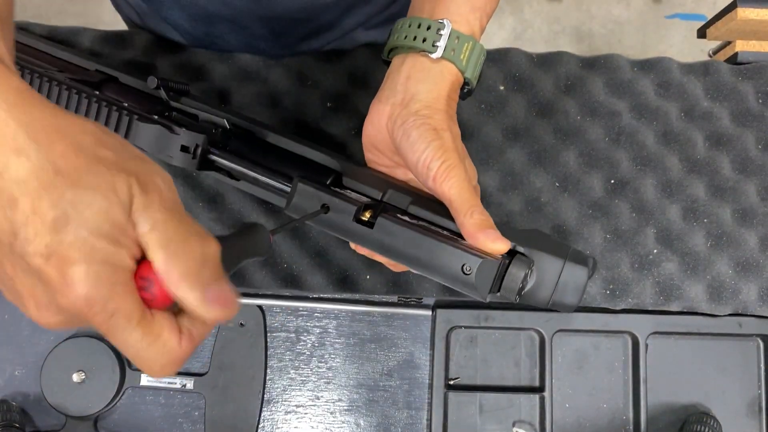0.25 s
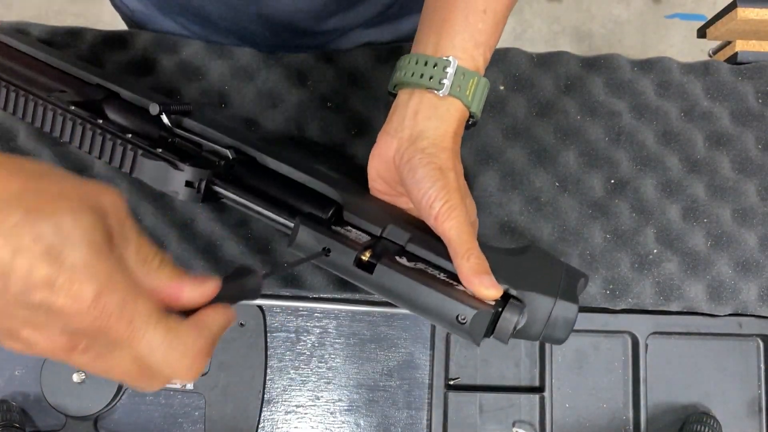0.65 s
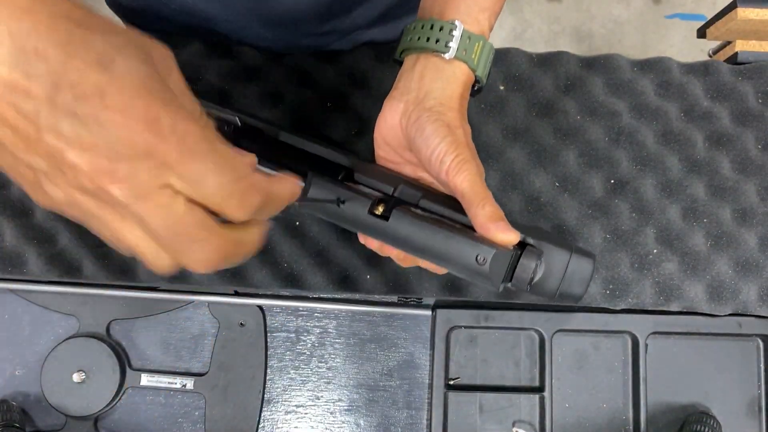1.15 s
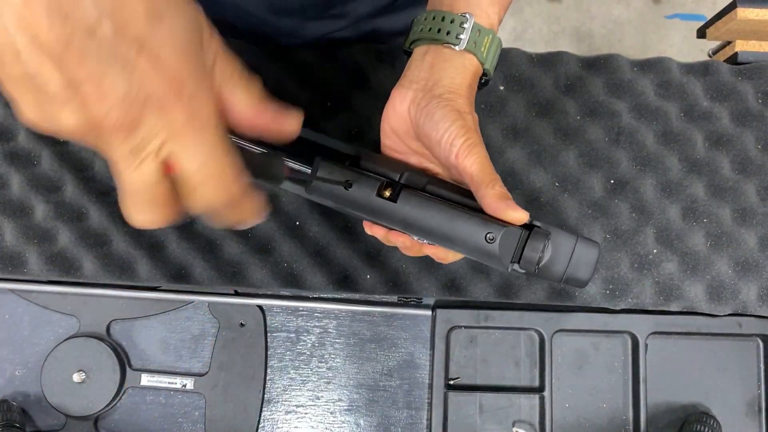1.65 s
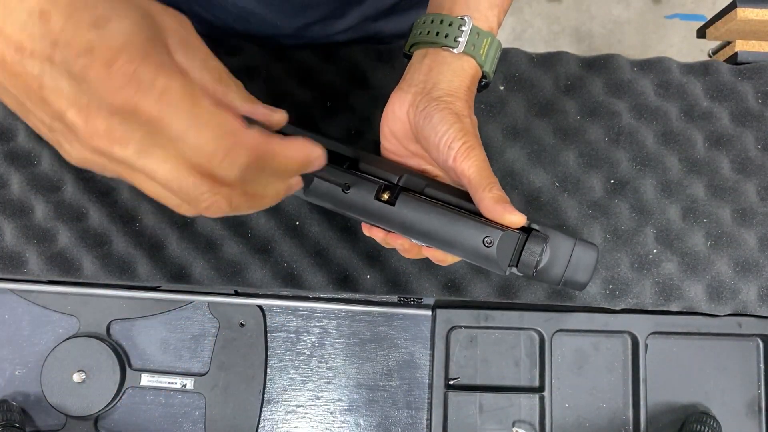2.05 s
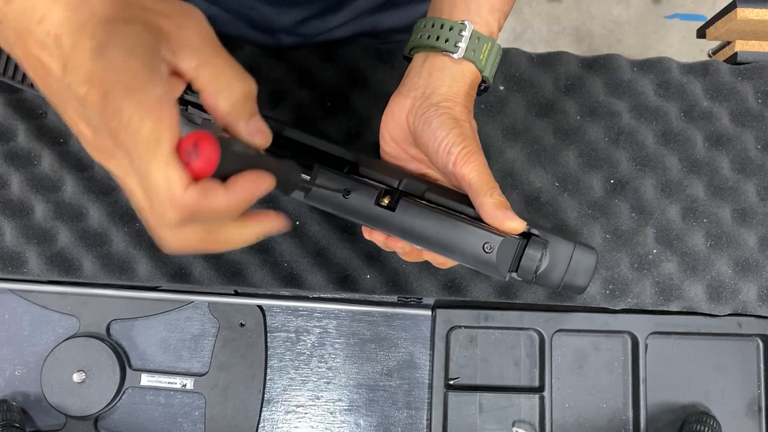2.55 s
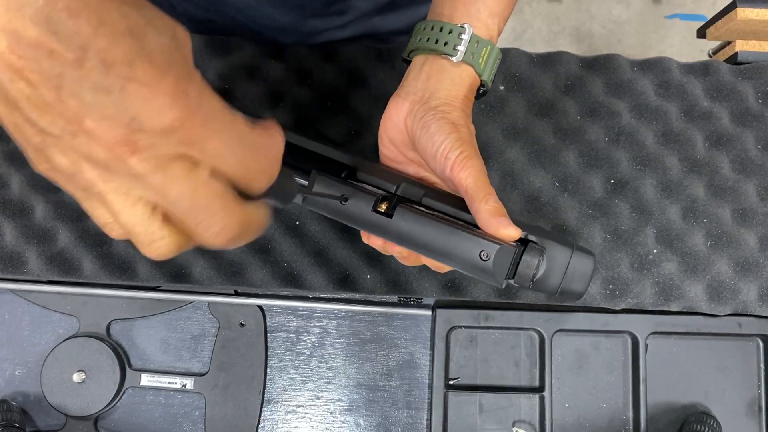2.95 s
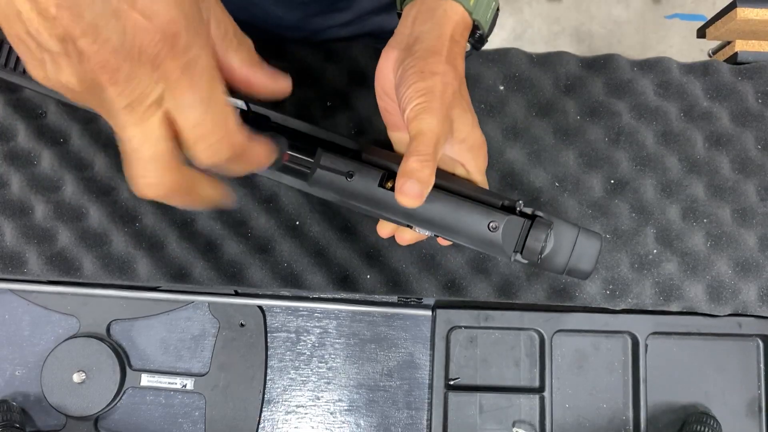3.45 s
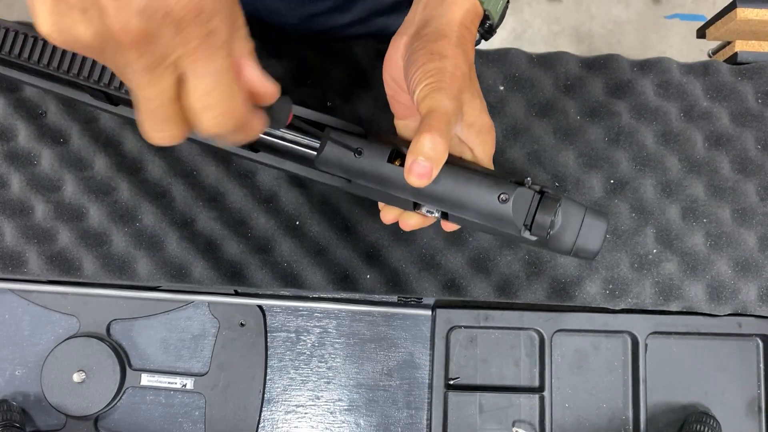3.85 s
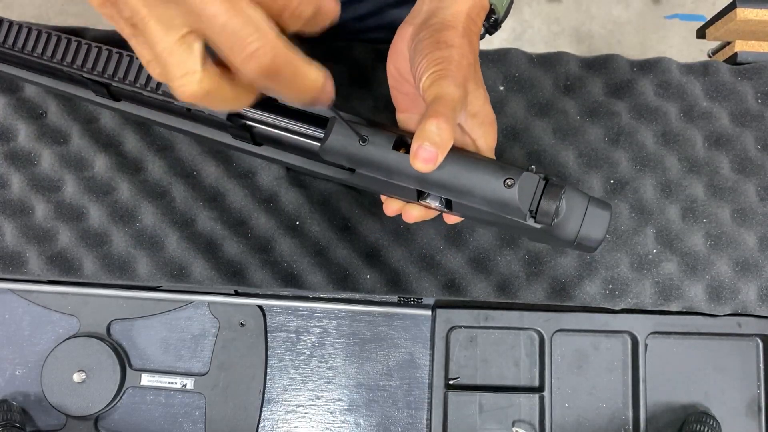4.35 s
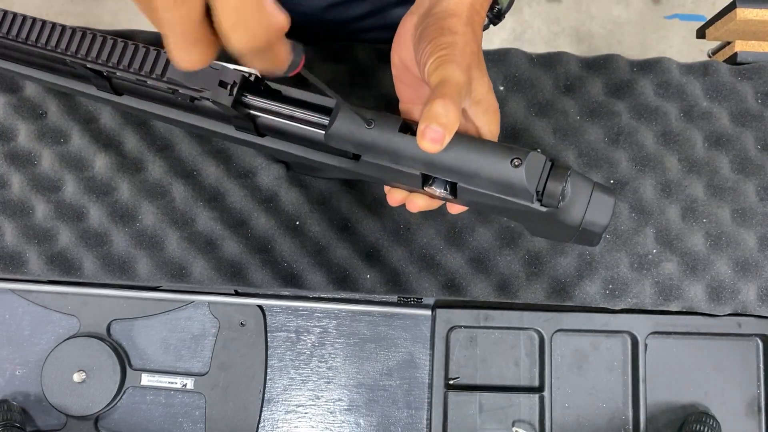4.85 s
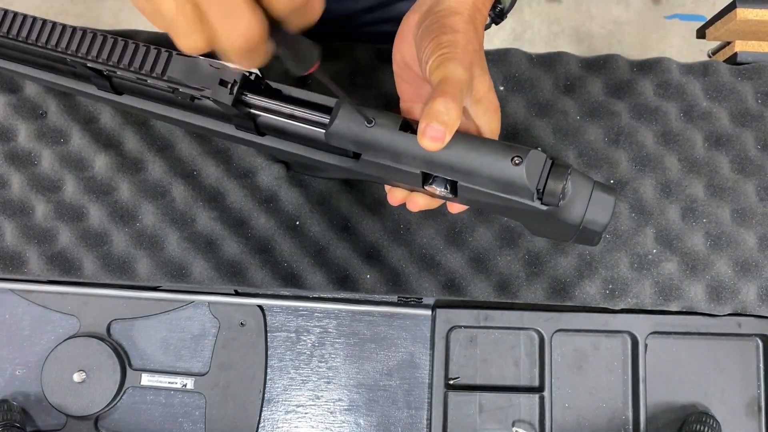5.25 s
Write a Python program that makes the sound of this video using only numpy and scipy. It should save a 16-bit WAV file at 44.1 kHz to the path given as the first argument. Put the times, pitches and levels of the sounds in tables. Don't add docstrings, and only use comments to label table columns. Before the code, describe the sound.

Compressed air hisses steadily from a loosened fitting on an air rifle, over a soft room rumble, with one sharp metallic click at the start.

```python
import sys
import numpy as np
from scipy import signal
from scipy.io import wavfile
from scipy.ndimage import uniform_filter1d

SR = 44100
rng = np.random.default_rng(int(sys.argv[2]) if len(sys.argv) > 2 else 0)


def boost(x):
    u = np.asarray(x, float) / 20
    return 10 ** u


def to_wav(s):
    ch = np.atleast_2d(s).T
    pcm = np.round(np.clip(ch, -1, 1) * 32767)
    wavfile.write(sys.argv[1], SR, pcm.astype(np.int16))


N = 242991

# freq_hz, density_db
JET_COLOUR = [(2200, -14.5), (3000, -8.9), (3500, -9.8), (4400, -5.3), (5400, -8.0), (6900, -8.1),
              (8400, -3.0), (9300, -2.8), (10500, -5.9), (11400, -6.9), (12400, -2.7), (13500, -1.9),
              (14100, -3.7), (15300, 0.0)]
# freq_hz, likeness_0_to_1
JET_LIKENESS = [(2500, .78), (3500, .74), (4400, .62), (5300, .68), (6500, .84), (7100, .5), (7900, .8),
                (8700, .7), (10000, .8), (11000, .94), (15000, .9)]
# freq_hz, left_minus_right_db
JET_BALANCE = [(2500, 0), (4400, 2.5), (6000, -2.5), (8500, 0.5), (10500, 1), (15000, -0.5)]
# freq_hz, lead_rad, extra_lead_rad, likeness_lost
JET_LEAD = [(2200, 2.4, -.2, .1), (2900, 3.15, .15, 0), (3600, 3.6, 1.1, .2), (4500, 5.0, .8, 0),
            (5200, 5.6, .8, .05), (6500, 6.3, .5, .25), (7100, 7.6, .9, .15), (7900, 9.4, .3, .12),
            (9500, 10.8, 0, 0), (11000, 12.45, 0, 0), (13400, 15.7, 0, 0), (16000, 18.9, 0, 0)]
# delay_s, level_db, wander_s
MIRRORS = [
    (.0011, -13.5, 0.000037),
    (.0017, -20, 0.000059),
    (.0029, 8.5, .00008),
]
# freq_hz, width_hz, level_db
GAP_RIDGES = [
    (4800, 28, 2),
    (7770, 80, 0),
    (11030, 146, 5.5),
]
# time_s, aside_0_to_1
TURNED_ASIDE = [
    (0, 0),
    (.3, .2),
    (.5, 1),
    (1.35, 1),
    (1.65, 0),
    (3.8, 0),
    (4.3, .4),
    (4.8, .55),
    (5.1, .9),
    (5.51, .9),
]
# freq_hz, level_db
ASIDE_TONE = [(3370, -0.5), (5100, -2), (7600, -2), (10800, -1), (15000, 0)]
# centre_s, shading_db, half_length_s
HAND_PASSES = [
    (.55, -5.5, 0.23),
    (1.153, -4.5, 0.22),
    (2.103, -2.5, 0.24),
    (3.029, -3.5, 0.19),
    (4.145, -1, .2),
    (4.75, -1.5, 0.5),
]
# freq_hz, share
HAND_SHADOW = [(3370, 0.13), (5100, 0.074), (7600, 0.15), (10800, 0.87), (15000, 0.61)]
JET_DB, SAG_DB_PER_S = -31.5, -0.09

# freq_hz, density_db
ROOM_COLOUR = [(20, -53), (31, -35), (45, -16), (62, 1.5), (90, -1), (130, -3), (165, -8.5), (250, -15),
               (400, -21), (700, -20.5), (1100, -26), (1700, -26.5), (2100, -27), (2700, -47)]
# freq_hz, likeness_0_to_1
ROOM_LIKENESS = [(60, 1), (130, 0.98), (250, 0.96), (500, 0.36), (800, 0.57), (1200, 0.46), (2200, .55)]
# freq_hz, lead_rad
ROOM_LEAD = [(60, .1), (250, 1), (780, 1.91), (1300, 1.87), (1800, 0.72), (2400, 2.9)]
# freq_hz, left_minus_right_db
ROOM_BALANCE = [(60, 0.5), (240, 2), (950, 3.5), (3770, -3), (15000, -1)]
ROOM_DB = -38
BENCH_S, BENCH_RISE_S, BENCH_DB = 3.9, 0.28, 3

# start_s, peak_db, upper_mode_brightness_db
CLICKS = [
    (0.0578, -1.5, 3.5),
    (.096, -31.5, -7.5),
    (2.553, -24.5, -1),
]
# freq_hz, level_db, t60_s
METAL_MODES = [(724, -16, 0.022), (1070, -4, 0.02), (1446, -4.5, 0.022), (2060, -7, 0.0077),
               (2960, -1.5, 0.007), (3514, 6, 0.013), (4440, -3.5, 0.017), (4810, 4.5, 0.013),
               (5950, -1, 0.0046), (6600, 8, 0.0042), (7320, 5, 0.0054), (10780, 6, 0.0057),
               (12500, -7, 0.004), (14900, 4.5, 0.0047)]
# start_s, high_modes_db, low_modes_db
BOUNCES = [
    (0, -0.5, -24),
    (.0007, -8, 3.5),
    (.0024, -19, 4),
    (.0046, -41, -1),
]
# start_s, peak_db, pitch_hz, t60_s, left_minus_right_db
KNOCKS = [
    (0.134, -32, 321, 0.14, 5),
    (0.19, -34, 334, 0.1, 3),
    (3.31, -41, 332, 0.098, 3.5),
    (3.497, -28, 324, 0.11, 3.5),
    (3.539, -32.5, 346, 0.14, 3),
]

BAND_LINES = [96, 108, 120, 132, 144, 160, 176, 196, 216, 240, 264, 292] + list(range(320, 769, 32))
# freq_hz, limit_db
MUTE_LIMIT = [(2200, -6.5), (2600, -5.6), (2950, -6.3), (3700, -6), (5500, -6.8), (6500, -6), (8000, -7.2),
              (10600, -8.3), (11400, -6.5), (12900, -11), (13400, -7.5), (14200, -8.5), (15600, -8)]


def evened(x):
    return x / np.sqrt(np.mean(abs(x) ** 2) + 1e-20)


def read(points, hz):
    f, value = np.transpose(points)
    return np.interp(np.log(hz + 1), np.log(f + 1), value)


def add(mix, s, sound):
    part = mix[:, round(s * SR):][:, :sound.shape[1]]
    part += sound[:, :part.shape[1]]


def drift(t, slow_hz, fast_hz):
    rates_hz = np.geomspace(slow_hz, fast_hz, num=24)
    return evened(sum(np.sin(2 * np.pi * (f * t + rng.random())) / np.sqrt(f) for f in rates_hz))


def patches(t, hz, long_s, wide_hz):
    field = rng.standard_normal((len(t), len(hz)))
    for _ in range(2):
        field = uniform_filter1d(field, max(1, round(long_s / t[1])), axis=0)
        field = uniform_filter1d(field, max(1, round(wide_hz / hz[1])), axis=1)
    return evened(field)


def microphone_pair(t, hz, same, lead, pan_db):
    a, b, c, d = rng.standard_normal((len(t), len(hz), 4)).transpose(2, 0, 1)
    same = np.clip(same, 0, 1)
    left = a + 1j * b
    right = same * left + np.sqrt(1 - same ** 2) * (c + 1j * d)
    right = right * np.exp(-1j * lead)
    return np.array([left * boost(pan_db / 2), right * boost(-pan_db / 2)])


def sounded(z):
    size = 2 * (z.shape[2] - 1)
    sound = signal.istft(z.transpose(0, 2, 1), nperseg=size, noverlap=3 * size // 4)[1]
    return evened(sound[:, :N])


def jet():
    t, hz = np.arange(N // 128 + 5) * 128 / SR, np.fft.rfftfreq(512, 1 / SR)
    aside = np.interp(t, *np.transpose(TURNED_ASIDE))[:, None]
    hand_db = sum(db * np.exp(-((t - s) / half_s) ** 2) for s, db, half_s in HAND_PASSES)[:, None]
    shadow = read(HAND_SHADOW, hz)

    colour_db = read([(1700, -45)] + list(JET_COLOUR) + [(15800, -3.5), (16400, -60)], hz)
    colour_db = colour_db + hand_db * shadow + aside * read(ASIDE_TONE, hz) + SAG_DB_PER_S * t[:, None]
    colour_db += sum(db / (1 + ((hz - f) / width) ** 2) for f, width, db in GAP_RIDGES)
    colour_db += 0.38 * patches(t, hz, 0.25, 300) + 0.44 * patches(t, hz, 0.04, 900)
    colour_db += 0.17 * drift(t, 2.5, 72)[:, None]

    f, lead, extra, lost = np.transpose(JET_LEAD)
    lead = np.interp(hz, f, lead) + aside * np.interp(hz, f, extra)
    same = read(JET_LIKENESS, hz) + 0.011 * hand_db * (1 - shadow)
    same -= aside * np.interp(hz, f, lost)
    z = microphone_pair(t, hz, same, lead, read(JET_BALANCE, hz))

    comb = 1
    for delay, db, wander in MIRRORS:
        delay_s = delay + wander * drift(t, 0.1017, 0.79)
        comb = comb + boost(db) * np.exp(-2j * np.pi * np.outer(delay_s, hz))
    return boost(JET_DB) * sounded(z * comb * boost(colour_db))


def room():
    t, hz = np.arange(N // 1024 + 5) * 1024 / SR, np.fft.rfftfreq(4096, 1 / SR)
    z = microphone_pair(t, hz, read(ROOM_LIKENESS, hz), read(ROOM_LEAD, hz), read(ROOM_BALANCE, hz))
    colour_db = read(ROOM_COLOUR, hz) + 0.83 * patches(t, hz, 0.07, 250)
    colour_db += 0.078 * drift(t, 0.29, 8)[:, None]
    bench_db = BENCH_DB / (1 + np.exp((BENCH_S - t) / BENCH_RISE_S))
    colour_db += np.outer(bench_db, np.interp(hz, (900, 1400), (0, 1)))
    return boost(ROOM_DB) * sounded(z * boost(colour_db))


def click(db, bright_db):
    t, out = np.arange(3000) / SR, np.zeros((2, 3000))
    for s, high_db, low_db in BOUNCES:
        ring = np.zeros((2, 3000))
        for hz, level, t60 in METAL_MODES:
            strike_db = high_db + bright_db if hz > 1800 else low_db
            gain = rng.uniform(0.84, 1.2, (2, 1))
            phase = 0.35 * rng.standard_normal((2, 1))
            decay = boost(level + strike_db - 60 * t / t60)
            ring += decay * gain * np.sin(2 * np.pi * hz * t + phase)
        add(out, s, ring * np.minimum(t / 0.00012, 1))
    return boost(db) * out / abs(out).max()


def knock(db, hz, t60, pan_db):
    t = np.arange(9000) / SR
    boom = sum(boost(level) * np.sin(2 * np.pi * hz * ratio * t)
               for ratio, level in ((1, 1.5), (0.72, -5), (1.4, -17)))
    boom *= boost(db - 60 * t / t60) * (1 - np.exp(-t / 0.0042))
    return boom * boost(1.0 + np.array([[pan_db], [-pan_db]]) / 2)


def thin_stereo(x):
    pad = 1024 - 467
    frame = dict(window=signal.windows.cosine(2048), nperseg=2048, noverlap=1024)
    sum_and_difference = np.pad([x[0] + x[1], x[0] - x[1]], ((0, 0), (pad, 0)))
    z = signal.stft(sum_and_difference, **frame)[2]
    loud = (abs(z[:, BAND_LINES[0]:]) ** 2).sum((0, 1))
    steady = loud < 2 * np.median(loud)
    spare_db = 0.9 * rng.standard_normal(len(loud))
    for low, high in zip(BAND_LINES, BAND_LINES[1:]):
        power = (abs(z[:, low:high]) ** 2).sum(1) + 1e-20
        ratio_db = 10 * np.log10(power / power[::-1])
        limit_db = read(MUTE_LIMIT, (low + high) / 2 * SR / 2048) + spare_db
        z[:, low:high] *= ~(steady & (ratio_db < limit_db))[:, None]
    total, difference = signal.istft(z, **frame)[1][:, pad:pad + N]
    return np.array([total + difference, total - difference]) / 2


def scene():
    mix = jet() + room()
    for s, *row in CLICKS:
        add(mix, s, click(*row))
    for s, *row in KNOCKS:
        add(mix, s, knock(*row))
    return mix


def roll_off(x):
    return signal.sosfilt(signal.butter(12, 17100, fs=SR, output="sos"), x)


def record(dry):
    edge = signal.firwin(1023, 15710, window=("kaiser", 9), fs=SR)
    limited = signal.oaconvolve(dry, edge[None], "same")
    return roll_off(thin_stereo(limited))


dry = scene()
out = record(dry)
to_wav(out)
```